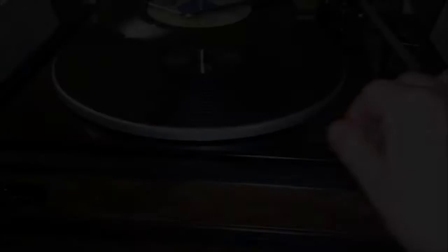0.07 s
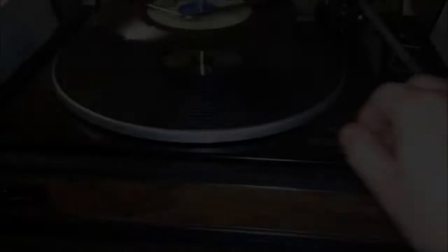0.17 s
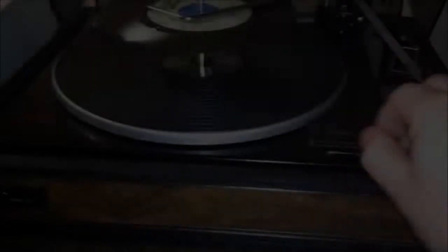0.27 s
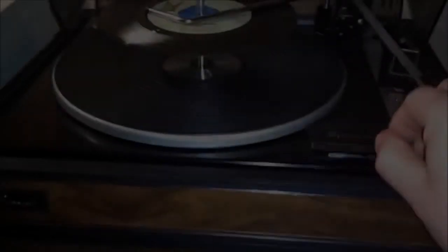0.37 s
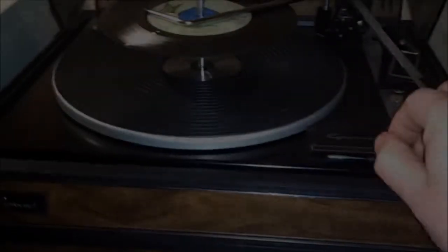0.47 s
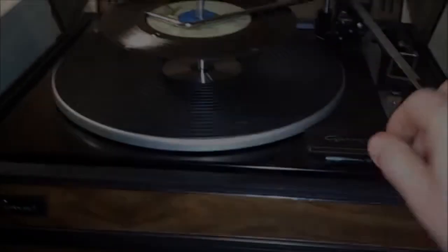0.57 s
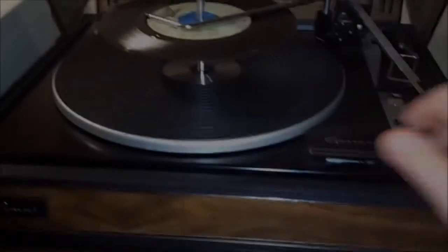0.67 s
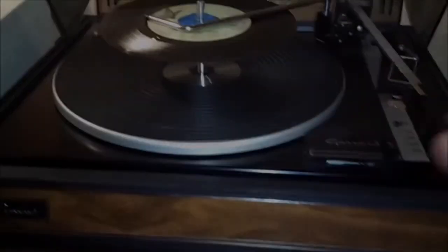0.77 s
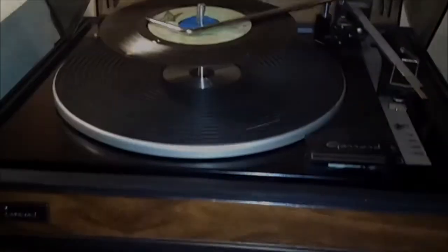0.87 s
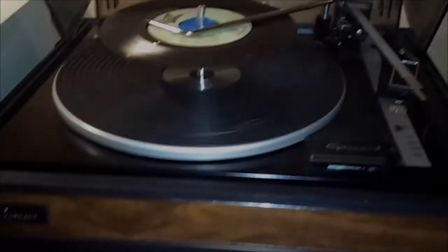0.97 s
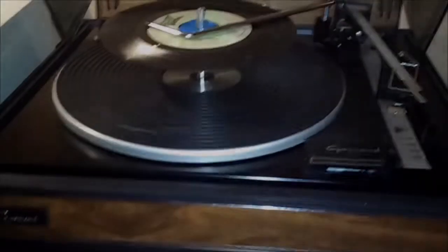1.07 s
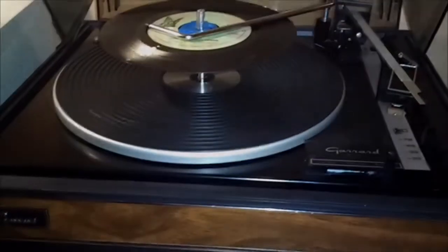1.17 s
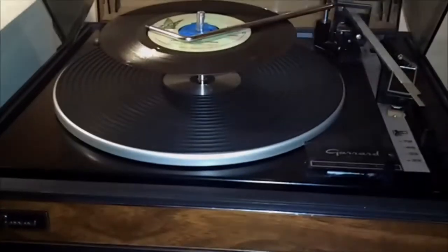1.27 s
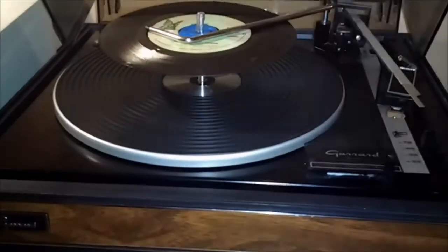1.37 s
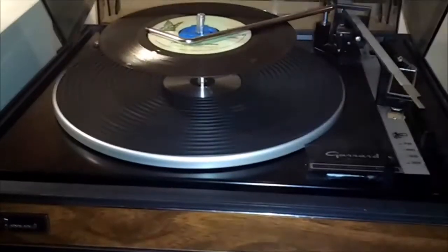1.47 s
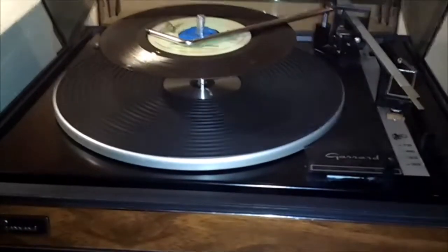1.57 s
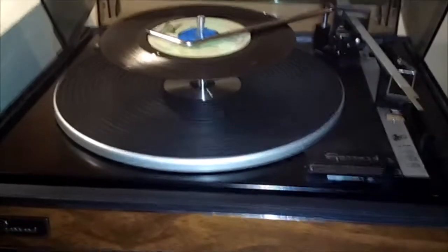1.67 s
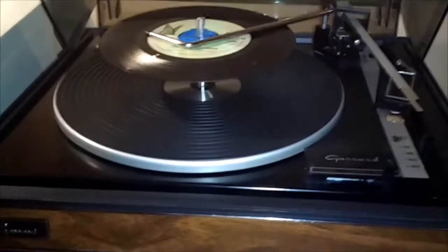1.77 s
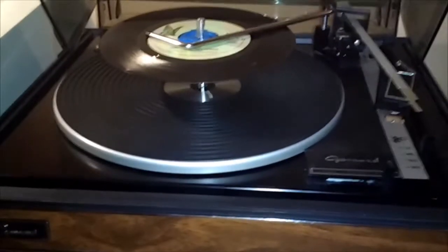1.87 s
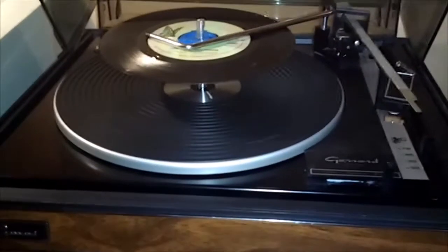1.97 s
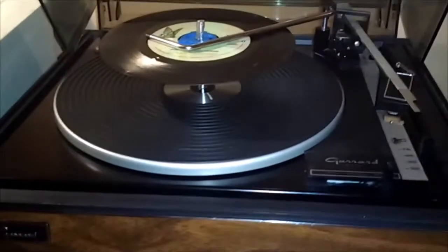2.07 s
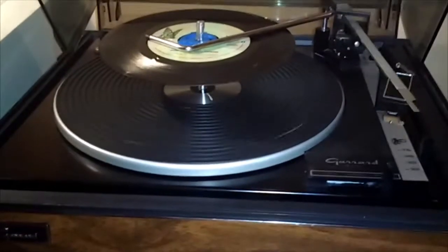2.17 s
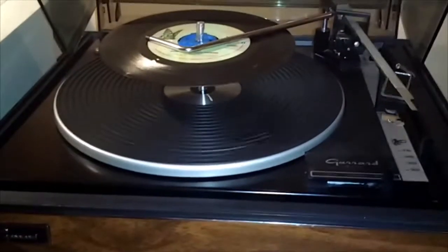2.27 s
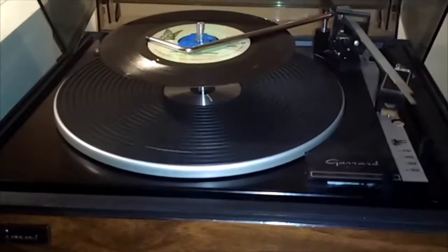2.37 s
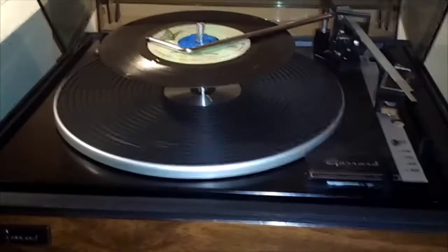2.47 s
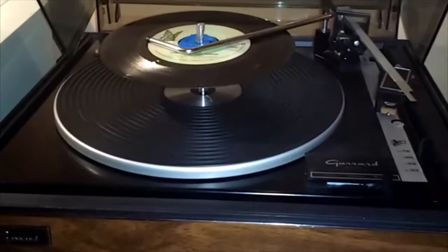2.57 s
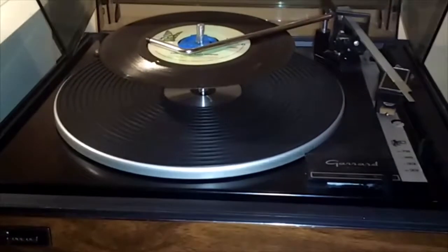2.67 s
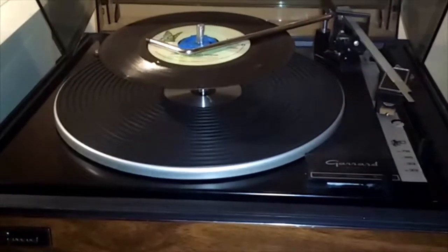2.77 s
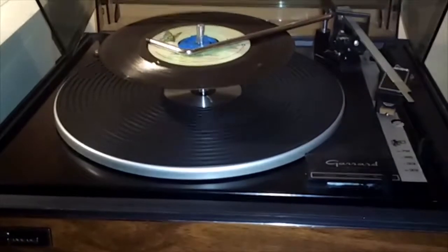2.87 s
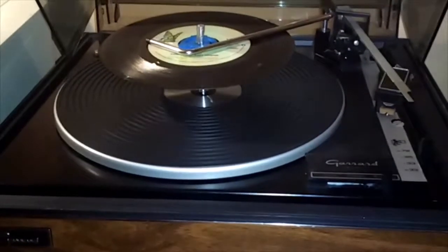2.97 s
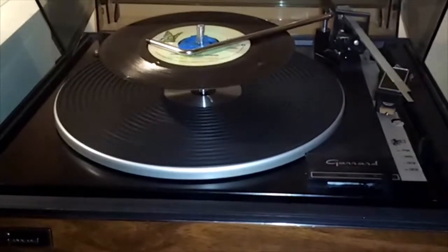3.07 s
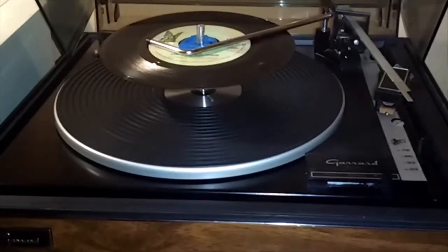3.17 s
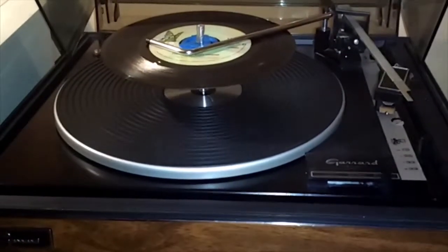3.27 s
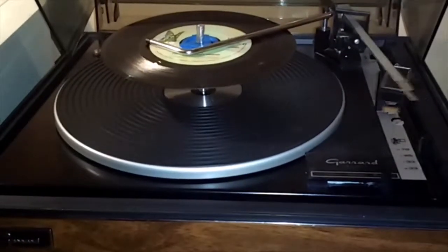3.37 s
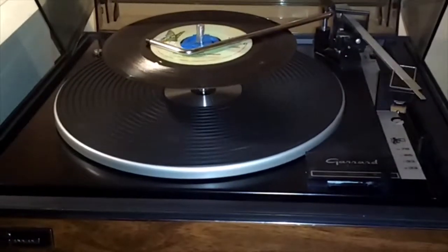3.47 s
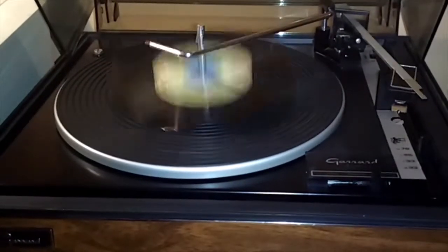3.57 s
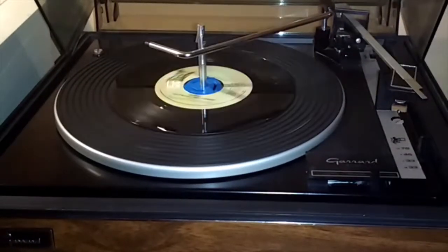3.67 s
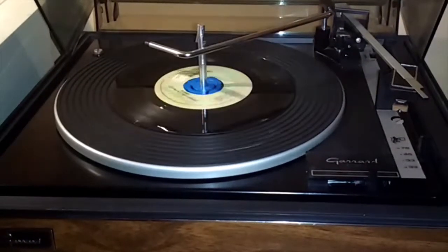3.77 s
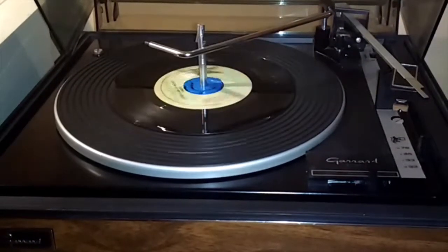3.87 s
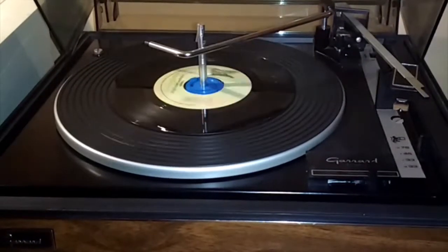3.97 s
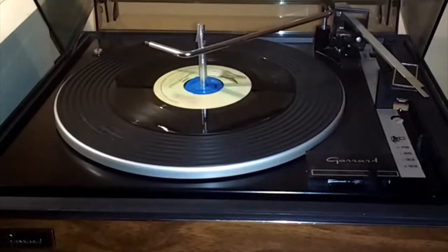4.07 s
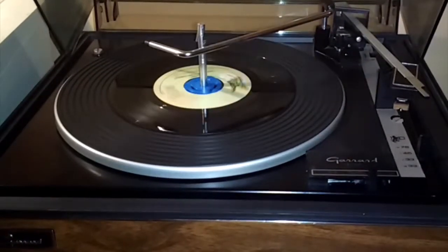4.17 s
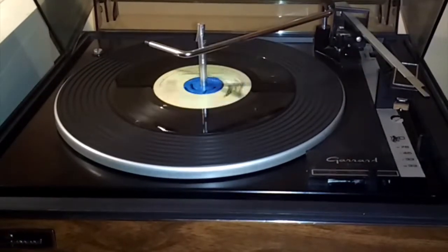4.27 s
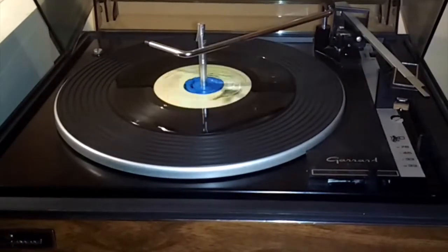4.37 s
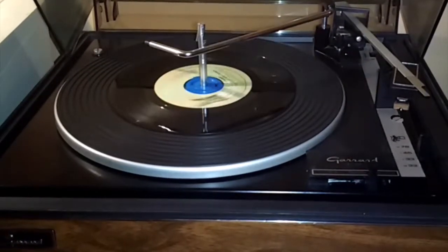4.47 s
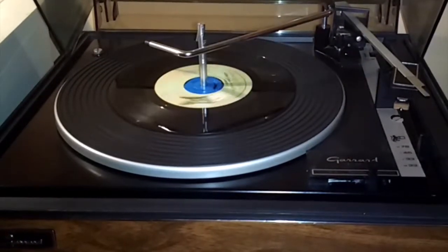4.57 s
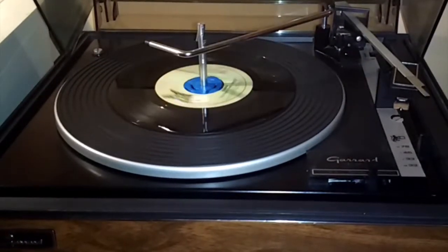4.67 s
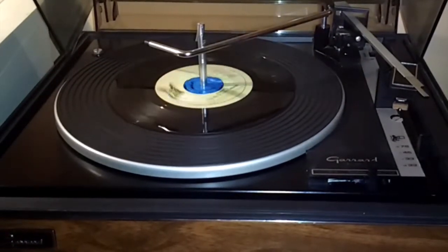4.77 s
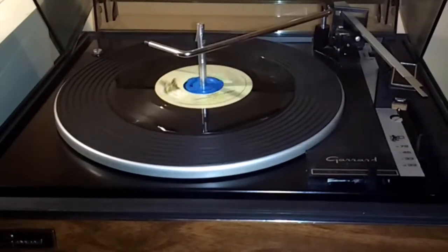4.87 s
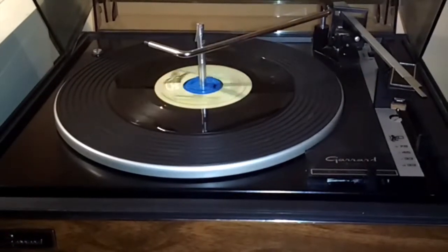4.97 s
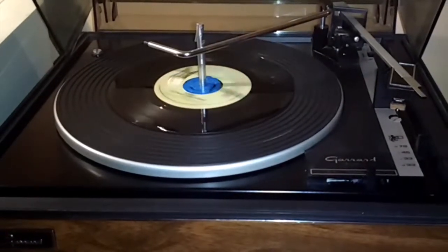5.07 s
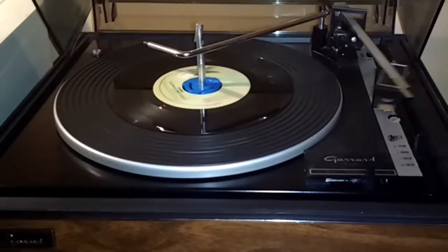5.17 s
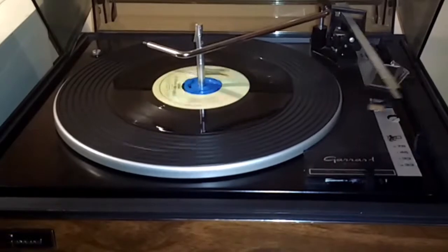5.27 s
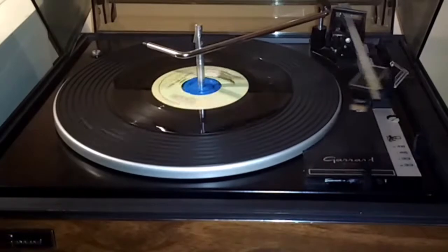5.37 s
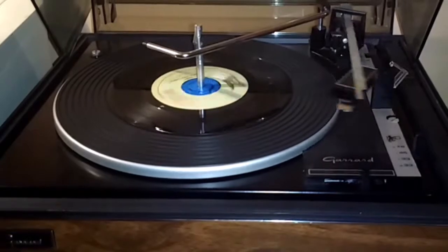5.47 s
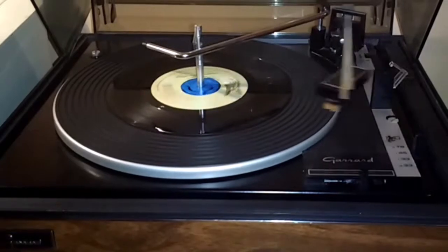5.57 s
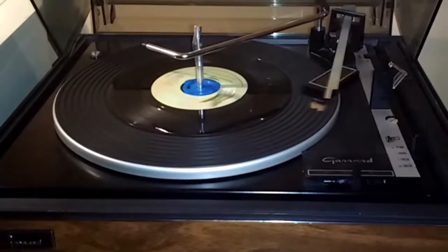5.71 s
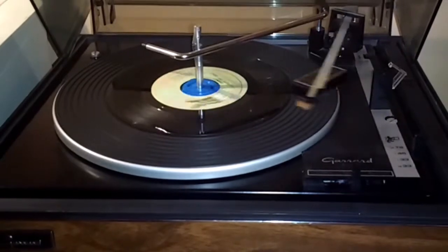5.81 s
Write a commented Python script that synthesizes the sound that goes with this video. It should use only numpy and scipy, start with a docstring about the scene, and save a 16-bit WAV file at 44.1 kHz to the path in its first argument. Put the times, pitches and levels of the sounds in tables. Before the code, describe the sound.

Close-up mechanical clicks and clacks of an automatic turntable over a low motor rumble, with a record dropping and a final sharp clack.

```python
"""An automatic record changer runs through its cycle in a quiet room, heard from close by.
The start lever is pushed and snaps home: blows excite noise and decaying modes of the deck.
The motor rumbles as harmonics and noise; the cam trips levers that click, and squeak as noise bursts.
A single drops onto the platter with a low thud of noise, then the cam ticks evenly as it swings the arm.
A last hard clack, a blow on the deck with a bright noise burst as its edge, sends the tone arm on its way."""
import sys
import numpy as np
from scipy import signal
from scipy.fft import rfft, irfft, next_fast_len
from scipy.io import wavfile

SR = 44100
rng = np.random.default_rng(int(sys.argv[2]) if len(sys.argv) > 2 else 0)


def int16_out(signal):
    """Quantize to a 16-bit WAV file."""
    q = np.round(np.clip(np.atleast_2d(signal).T, -1, 1) * 32767)
    wavfile.write(sys.argv[1], SR, q.astype(np.int16))


N = 257544
TIME = np.arange(N) / SR


def from_db(db):
    """Level law: decibels to amplitude gain."""
    return 10 ** (np.asarray(db) / 20)


def at_hz(points, hz):
    """Spectral interpolation: read a table linearly along log frequency."""
    x, y = np.transpose(points)
    return np.interp(np.log(np.maximum(hz, 1)), np.log(x), y)


def dying(t, t60):
    """Exponential free decay: 60 dB down after t60."""
    return np.exp(-np.log(1000) * t / t60)


def drift(rate):
    """Slow random modulation: straight lines between normal values of spread 1, `rate` per second."""
    knots = rng.standard_normal(int(rate * N / SR) + 2)
    return np.interp(TIME * rate, np.arange(len(knots)), knots)


def band_noise(hz, octaves, size):
    """Band-limited noise: two uncorrelated rows around one pitch, rms 1."""
    edges = hz * 2 ** (np.array([-.5, .5]) * octaves)
    edges = np.clip(edges, 10, SR / 2 - 100)
    band_pass = signal.butter(2, edges, "band", fs=SR, output="sos")
    noise = signal.sosfilt(band_pass, rng.standard_normal((2, size)))
    return noise / noise.std()


# centres of the third-octave bands [Hz]
BANDS_HZ = 25 * 2 ** (np.arange(29) / 3)


def third_octaves():
    """Third-octave synthesis: each band's centre and its noise."""
    for hz in BANDS_HZ:
        yield hz, band_noise(hz, 1 / 3, size=N)


def add(out, s, sound):
    """Linear superposition: mix a sound in at time s."""
    at = max(int(s * SR), 0)
    out[..., at:at + sound.shape[-1]] += sound[..., :N - at]


def puff(db, hz, octaves, length):
    """Noise burst: a band of noise that swells and dies within about its length in seconds."""
    age = np.pi * np.arange(SR // 4) / SR / length
    swell = age * np.exp(1 - age)   # peaks at 1
    return from_db(db) * swell * band_noise(hz, octaves, size=len(age))


MOTOR_HZ = 24.45   # mean turns per second
RUMBLE_DB = 3.5   # rumble against the drive's effort
RUBBING_DB, RUBBING_FOLLOWS = -64, 0.59   # level at mean effort; share of the effort's swing in dB

# effort of the running drive: (time [s], level [dB])
DRIVE_EFFORT = [(0.0, -82), (0.16, -62), (0.32, -55.5), (0.47, -65.5), (0.68, -64), (1.27, -57.5),
                (1.54, -58.5), (1.67, -55.5), (2.7, -58.5), (3.25, -63), (4.03, -61), (4.23, -58),
                (4.91, -58.5), (5.84, -56.5)]
# spectrum of the shaken plinth: (frequency [Hz], relative level per third octave [dB])
RUMBLE_SPECTRUM = [(25, -23), (45, -13.5), (75, -9.5), (170, 4), (250, -2), (400, -4), (750, -4),
                   (1200, -7.5), (2000, -10), (4000, -27)]
# spectrum of platter bearing and cam: (frequency [Hz], relative level per third octave [dB])
RUBBING_SPECTRUM = [(400, -23), (1000, -28), (1600, -4), (2200, 2.5), (2900, -2.5), (4500, 0), (8000, -3.5),
                    (15000, -5.5)]
# harmonics of the motor's shake: (multiple of its speed [1], relative level [dB])
MOTOR_ORDERS = [(3, -16), (4, -25), (5, -25), (6, -22), (7, -12), (8, -14), (10, -14.5), (15, -13.5),
                (35, -19), (58, -20)]


def drive(flutter_db=3.0, wow=0.01387, motor_db=-1):
    """Forced vibration and friction: motor and idler shake the plinth while bearing and cam rub."""
    effort_db = np.interp(TIME, *np.transpose(DRIVE_EFFORT))
    rumble = from_db(RUMBLE_DB + effort_db)
    rubbing = from_db(RUBBING_DB + RUBBING_FOLLOWS * (effort_db - effort_db.mean()))
    # each spectrum is scaled so that its bands sum to unit power
    rumble_sum = np.linalg.norm(from_db(at_hz(RUMBLE_SPECTRUM, BANDS_HZ)))
    rubbing_sum = np.linalg.norm(from_db(at_hz(RUBBING_SPECTRUM, BANDS_HZ)))

    out = np.zeros((2, N))
    load = drift(rate=25)   # flutter common to all bands
    for hz, noise in third_octaves():
        rumble_band = rumble * from_db(at_hz(RUMBLE_SPECTRUM, hz)) / rumble_sum
        rubbing_band = rubbing * from_db(at_hz(RUBBING_SPECTRUM, hz)) / rubbing_sum
        level = np.hypot(rumble_band, rubbing_band)   # powers add
        own = drift(rate=40)
        out += level * from_db(flutter_db * (.5 * load + own)) * noise

    speed_hz = MOTOR_HZ * (1 + wow * drift(rate=10))
    angle = 2 * np.pi * np.cumsum(speed_hz) / SR
    for order, db in MOTOR_ORDERS:
        shake = np.sin(order * angle + 2 * np.pi * rng.random((2, 1)))
        out += rumble * from_db(motor_db + db) * (1 + .5 * drift(rate=12.0)) * shake
    return out


# faint slips come by chance once the cam turns
CAM_FROM_S, SLIPS_PER_S = 1.7, 2.5
SLIP_HZ, SLIP_OCTAVES = 4830, 1.53   # centre and full range of their pitches
SLIP_DB, SLIP_S = -68, 0.024

# squeaks and ticks of the linkage, and last the bright 8 kHz edge of the final clack:
# (time [s], frequency [Hz], level [dB], length [s])
SQUEAKS_AND_CLACK_EDGE = [(1.009, 1270, -52, 0.014), (1.797, 6950, -64.5, 0.044), (1.845, 4500, -60, 0.058),
                          (2.709, 734, -50, 0.021), (2.993, 4040, -58, 0.047), (3.08, 1990, -53, 0.035),
                          (4.706, 2230, -57.5, .034), (4.793, 3480, -57.5, .046), (5.283, 6940, -54, 0.012),
                          (5.454, 6350, -52, 0.014), (5.674, 7900, -31, 0.014)]


def linkage_and_clack_edge(octaves=0.25):
    """Stick-slip friction: levers slip in narrow-band squeaks; a like burst edges the final clack."""
    out = np.zeros((2, N))
    for s, hz, db, length in SQUEAKS_AND_CLACK_EDGE:
        add(out, s, puff(db, hz, octaves, length))
    turning_s = N / SR - CAM_FROM_S
    for when, pitch in rng.random((int(SLIPS_PER_S * turning_s), 2)):
        slip_hz = SLIP_HZ * 2 ** (SLIP_OCTAVES * (pitch - .5))
        add(out, CAM_FROM_S + when * turning_s, puff(SLIP_DB, slip_hz, octaves, SLIP_S))
    return out


TICKS_FROM_S, TICK_EVERY_S = 5.337, 0.066
TICK_HZ, TICK_DB, TICK_S = 850, -54.5, 0.016


def cam_ticks(count=5, octaves=0.38):
    """Periodic excitation: an even run of dull ticks as the cam swings the tone arm."""
    out = np.zeros((2, N))
    for k in range(count):
        add(out, TICKS_FROM_S + k * TICK_EVERY_S, puff(TICK_DB, TICK_HZ, octaves, TICK_S))
    return out


LANDING_S, LANDING_DB = 3.647, -34.5   # the single meets the mat


def landing():
    """Air displacement: the falling single presses air from under itself in a soft, low thud."""
    out = np.zeros((2, N))
    add(out, LANDING_S, puff(LANDING_DB, hz=109, octaves=1.6, length=0.0092))
    return out


HAND_UNTIL_S = 0.8   # the hand lets go of the start lever
PUSHED_RISE_S, PUSHED_T60_S = 0.0027, 0.086   # parts pushed together by hand linger
SPRUNG_RISE_S, SPRUNG_T60_S = 0.0021, 0.077   # parts let fly by the cam click crisply


def contact(s):
    """Contact duration: rise and decay time of a blow at time s, pushed by hand or sprung by the cam."""
    if s < HAND_UNTIL_S:
        return PUSHED_RISE_S, PUSHED_T60_S
    return SPRUNG_RISE_S, SPRUNG_T60_S


PIVOT_HZ = 2380   # weight acts below this pitch, hardness above it
BODY_HZ, BASS_FALL_DB = 986, 5   # below the body, small levers lose this much per octave, for two octaves


def strength_db(db, weight, hardness, hz):
    """Impact spectrum: heavy parts reach the deck's body, hard contacts the treble."""
    down = np.log2(PIVOT_HZ / np.clip(hz, BODY_HZ, PIVOT_HZ))
    up = np.log2(np.maximum(hz / PIVOT_HZ, 1))
    bass = np.log2(BODY_HZ / np.clip(hz, BODY_HZ / 4, BODY_HZ))
    return db + weight * down + hardness * up - BASS_FALL_DB * bass


def small_parts(count=90, parts_db=-13, spread_db=2, t60=0.14):
    """Modal density: springs and steel levers add many thin treble modes, rows (Hz, dB, t60 s)."""
    hz = np.geomspace(3000, 14000, count) * rng.uniform(.985, 1.015, count)
    db = parts_db + at_hz(DECK_COLOUR, hz) + spread_db * rng.standard_normal(count)
    return np.column_stack([hz, db, np.full(count, t60)])


# blows in the mechanism: (time [s], strength [dB], weight towards the bass [dB per octave],
# hardness towards the treble [dB per octave], the part's own note [Hz], note against the blow [dB])
BLOWS = [ (.041, -44.5, -11, -7, 1570, -9), (.168, -59, 14.5, -9, 1150, -10), (.208, -55, 3, 0, 6600, 0),
         (.257, -35, 6.5, 1, 815, -8), (0.271, -35, 5, 0, 2300, 0.5), (.309, -40.5, -3.5, -1.5, 791, 9),
         (.336, -41, 1, 6.5, 6570, -3), (.362, -18.5, -9.5, -4.5, 2240, -13),
         (.451, -46.5, -2, -7, 1585, 0), (.677, -61, 2, -10, 830, -8), (1.517, -38.5, 0.5, -2, 801, -3.5),
         (1.585, -29, 2, -8, 1206, -6.5), (3.553, -32, 0, -5.5, 1145, -6), (3.573, -33, -2, -9.5, 446, -8),
         (3.622, -29.5, -3, -4.5, 826, 0), (3.645, -22, -6.5, -1, 1965, 2.5),
         (3.652, -18.5, -7.5, -9.5, 320.6, -13), (4.115, -38, -7, -17, 908, -3.5),
         (5.080, -36.5, 0.5, -20, 2360, -7), (5.675, -13.5, -8, -11.5, 2790, -9),
         (5.688, -31, 5, 0, 337, -10.5), (5.737, -36, -3, -14, 2410, -1)]
# what the steel deck and its plinth ring with: (frequency [Hz], relative level [dB], t60 [s])
DECK_MODES = [(332, -12, 0.27), (424, -6.5, 0.12), (458.4, -10.5, 0.19), (745.5, -9, 0.23),
              (855, -10.5, 0.18), (902, -4, .12), (1182, -4.5, 0.11), (1268, -8, 0.12), (1375, -22, 0.18),
              (1810, -9, 0.14), (2056, -15, 0.22), (2098, -10.5, 0.14), (2308, -0.5, 0.055),
              (2278, -13, 0.16), (2420, -22.5, 0.22), (2780, -14, 0.12), (3090, -29, 0.1),
              (4670, -19, 0.072)]


def ringing(modes_db=-2, scatter_db=2, note_t60=0.12, low_note_t60=0.37):
    """Modal synthesis: each blow rings the modes a little differently, and the struck part's own note."""
    t, out = np.arange(SR // 3) / SR, np.zeros((2, N))
    hz, mode_db, t60 = np.vstack([DECK_MODES, small_parts()]).T
    modes = dying(t, t60[:, None]) * np.exp(2j * np.pi * hz[:, None] * t)
    for s, *blow, note_hz, note_db in BLOWS:
        phases = np.exp(2j * np.pi * rng.random((2, len(hz) + 1)))
        scatter = scatter_db * rng.standard_normal(len(hz))
        gains = from_db(modes_db + mode_db + strength_db(*blow, hz) + scatter)
        lasting = at_hz([(800, low_note_t60), (2000, note_t60)], note_hz)   # low notes ring longer
        note_gain = from_db(note_db + strength_db(*blow, note_hz))
        note = note_gain * dying(t, lasting) * np.exp(2j * np.pi * note_hz * t)
        rung = ((phases[:, 1:] * gains) @ modes + phases[:, :1] * note).real
        rise, _ = contact(s)
        add(out, s, (1 - np.exp(-t / rise)) * rung)
    return out


# the deck's dense, short-lived resonances between its modes:
# (frequency [Hz], relative level per third octave [dB])
DECK_COLOUR = [(50, -37), (160, -46), (250, -28.5), (330, -18), (420, -19.5), (530, -22), (800, -8.5),
               (1250, -10), (1550, -9.5), (2500, -7.5), (3500, -13.5), (4500, -8.5), (6000, -15),
               (8200, -12), (15000, -17)]


def clatter(hold_s=0.0044, chatter_db=0.5, room_db=-21, room_t60=0.33, treble_room_t60=0.36):
    """Diffuse impact response: each blow spreads through the deck, dies fast and leaves a room tail."""
    t, out = np.arange(SR // 2) / SR, np.zeros((2, N))
    chatter = from_db(chatter_db * (drift(rate=500) + 0.59))   # loose parts touch again and again
    for hz, noise in third_octaves():
        tail_t60 = at_hz([(800, room_t60), (8000, treble_room_t60)], hz)
        tail = from_db(room_db) * dying(t, tail_t60)
        power = np.zeros(N)
        for s, db, weight, hardness, _, _ in BLOWS:
            rise, t60 = contact(s)
            direct = dying(np.maximum(t - hold_s, 0), t60)
            attack = from_db(strength_db(db, weight, hardness, hz)) * (1 - np.exp(-t / rise))
            add(power, s, attack ** 2 * (direct ** 2 + tail ** 2))
        out += from_db(at_hz(DECK_COLOUR, hz)) * np.sqrt(power) * noise
    return out * chatter


# phase by which left leads right: (frequency [Hz], phase [rad])
PHASE_LEAD = [(0, 3.14), (130, 3.3), (220, 4.0), (400, 5.5), (750, 5.7), (1280, 5.65), (1650, 3.1),
              (2450, 1.4), (2850, -.1), (3580, -3.14), (16020, -47.1)]
# left-right likeness of the blows, then of the drive: (frequency [Hz], likeness [1])
BLOW_LIKENESS = [(100, 0.96), (250, 0.71), (400, 1), (550, 0.82), (900, 0.91), (1300, 0.81), (1600, 0.48),
                 (2200, 1), (8000, 0.93), (14000, 1)]
DRIVE_LIKENESS = [(90, 0.89), (200, 0.81), (370, 0.11), (700, 0.66), (1100, 0.96), (1550, 0.63),
                  (2000, 0.61), (2550, 0.4), (4000, 1), (14000, 0.96)]
# left minus right: (frequency [Hz], level difference [dB])
BLOW_BALANCE = [(180, -3.5), (320, 4.5), (520, 14.5), (750, -1), (1000, 1.5), (1450, -2.5), (1900, 1),
                (6000, -0.5)]


def stereo(x, likeness, balance_db):
    """Interchannel coherence: row one is shared, row two differs; left lags in treble, opposes in bass."""
    size = next_fast_len(N + SR // 10)
    hz = np.arange(size // 2 + 1) * SR / size
    shared, apart = rfft(x, size)
    alike = np.clip(at_hz(likeness, hz), 0, 1)
    shared = shared * np.sqrt((1 + alike) / 2)
    apart = apart * np.sqrt((1 - alike) / 2)
    lean = from_db(at_hz(balance_db, hz) / 2) if balance_db else 1
    lead = np.exp(1j * np.interp(hz, *np.transpose(PHASE_LEAD)))
    left = (shared + apart) * lean * lead
    right = (shared - apart) / lean
    return irfft(np.array([left, right]), size)[:, :N]


def scene():
    """Superposition of sources: blows, squeaks, ticks and the landing single over the running drive."""
    background = stereo(drive(), DRIVE_LIKENESS, None)
    mechanism = linkage_and_clack_edge() + cam_ticks() + landing() + ringing() + clatter()
    return background + stereo(mechanism, BLOW_LIKENESS, BLOW_BALANCE)


CUTOFF_HZ = 15750


def record(dry, fade_s=0.049):
    """Low-pass filtering: the sound fades in and the top is cut."""
    fade = np.minimum(TIME / fade_s, 1) ** 2
    low_pass = signal.ellip(10, .1, 80, CUTOFF_HZ, fs=SR, output="sos")
    return signal.sosfilt(low_pass, dry * fade)


dry = scene()
out = record(dry)
int16_out(out)
```